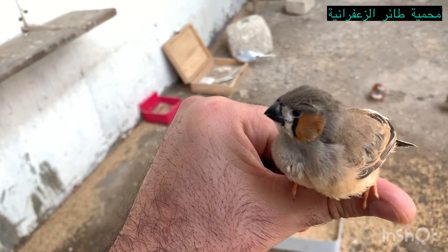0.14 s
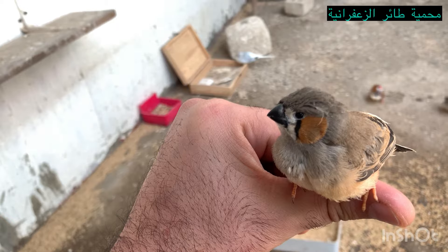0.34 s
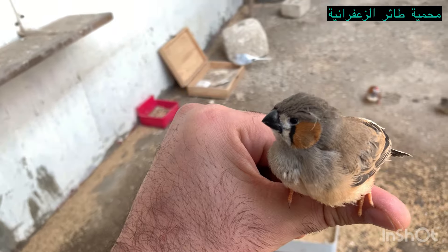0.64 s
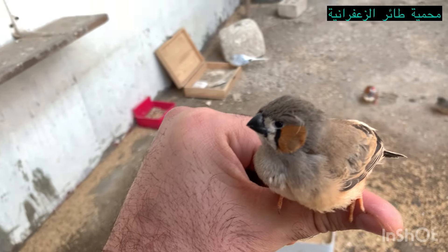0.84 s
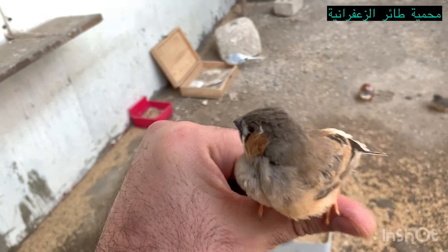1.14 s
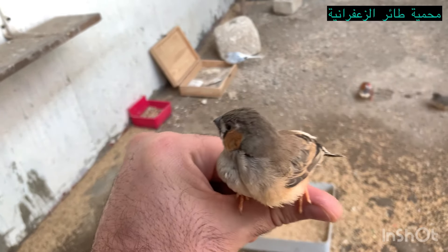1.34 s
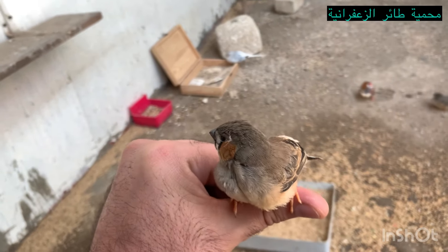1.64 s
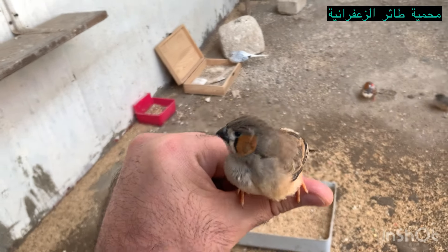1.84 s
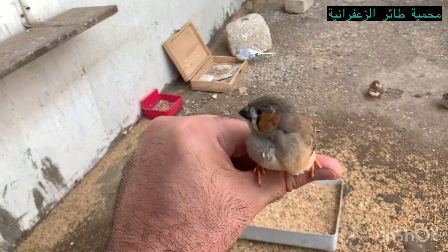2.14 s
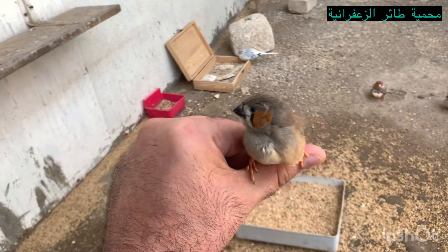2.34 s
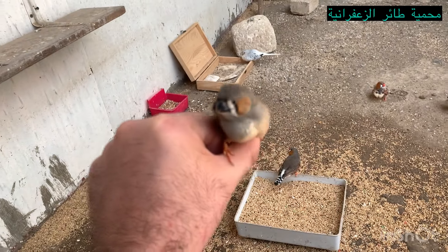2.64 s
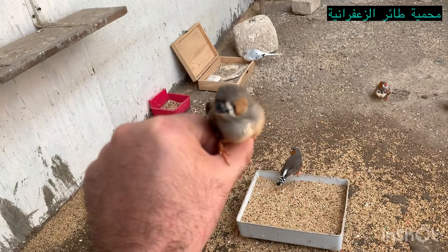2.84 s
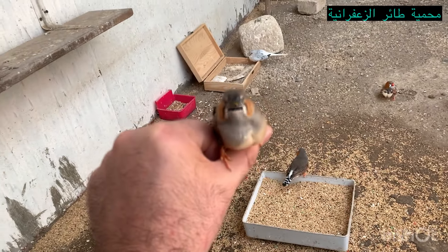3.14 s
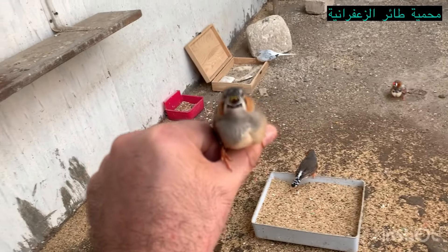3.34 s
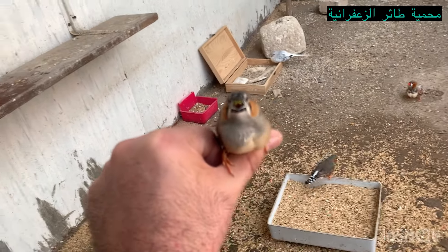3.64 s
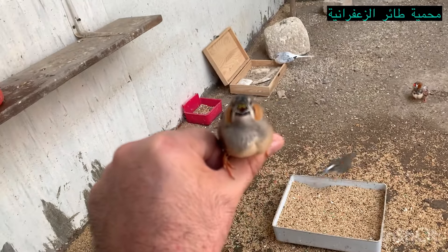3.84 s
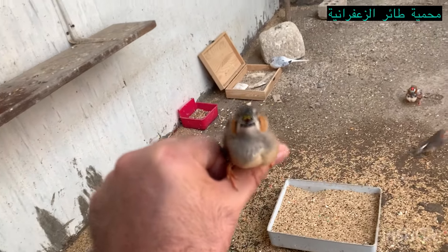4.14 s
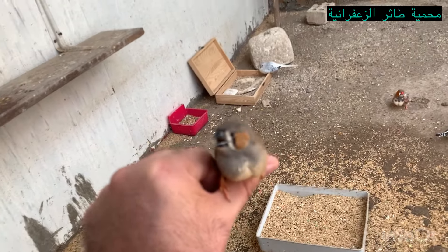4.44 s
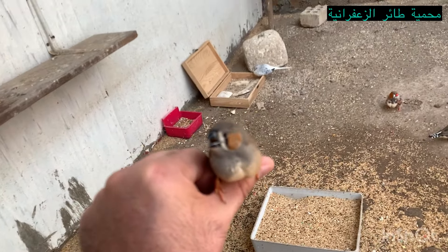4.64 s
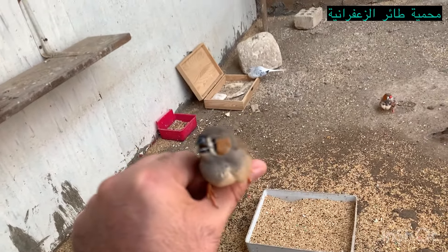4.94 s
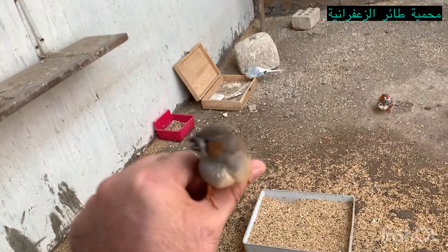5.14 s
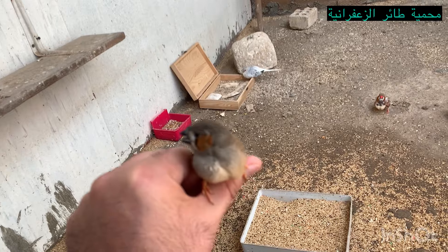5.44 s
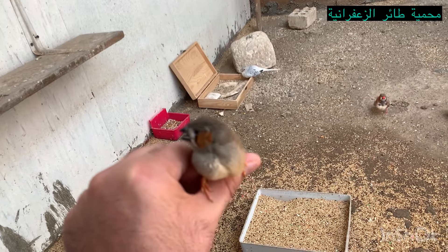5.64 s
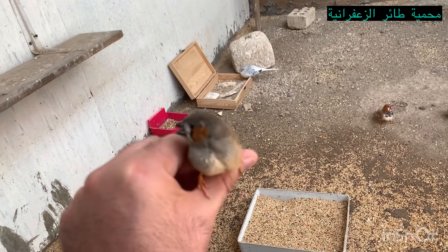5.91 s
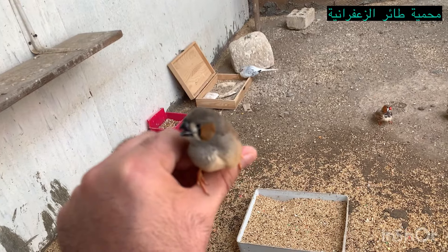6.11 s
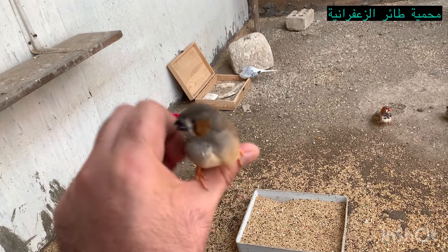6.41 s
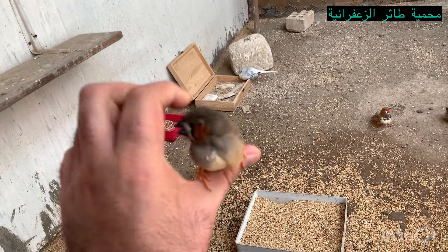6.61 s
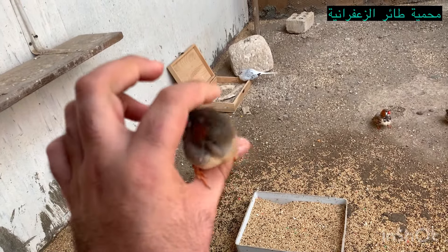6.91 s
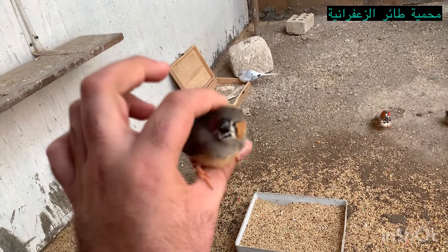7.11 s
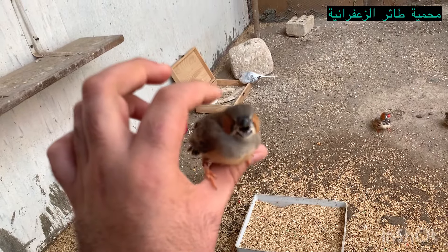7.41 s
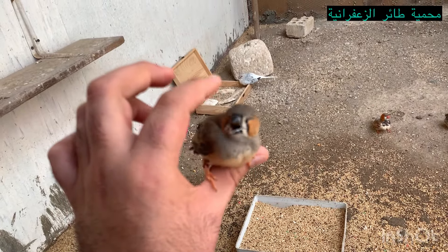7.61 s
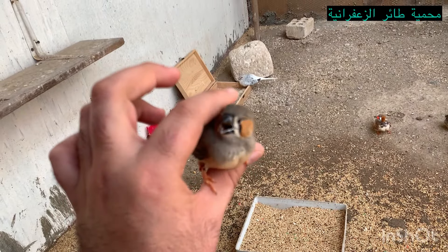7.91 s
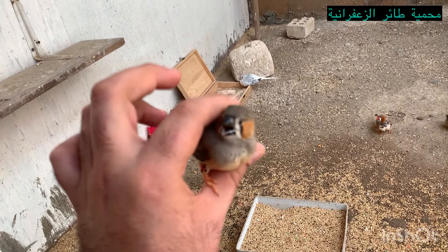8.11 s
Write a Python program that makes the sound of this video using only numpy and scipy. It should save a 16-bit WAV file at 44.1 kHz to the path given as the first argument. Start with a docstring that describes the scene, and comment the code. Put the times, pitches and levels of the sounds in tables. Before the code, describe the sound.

Handheld stereo pickup among finches in a concrete-walled yard. A singer cycles a brisk nasal phrase built around a loud falling chirp, pausing briefly around the middle and near the end. Single high peeps cut through, most clearly at the start, and scratchy begging calls cluster in the middle and last second. Faint flock chirps, soft air, fading tyre noise and low hum lie behind; a low gust or bump comes late.

```python
"""Zebra finches in a small walled aviary

One bird repeats a motif: a pip, a soft slur, a whistle, a steep loud slur and a closing call. Others rasp,
peep and chirp around it. Clear notes are gliding sines or stacks of harmonics; hoarse ones are uneven
pulses and puffs of air filtered by a throat and beak. Random echo taps act as hard walls. Shaped noise makes
the air, tyres and a low rumble with a late burst of handling or wind. Wavering sines hum, damped ones bump."""
import sys
import numpy as np
from scipy import signal
from scipy.fft import rfft, irfft, next_fast_len
from scipy.io import wavfile
from scipy.ndimage import uniform_filter1d

SR = 44100
rng = np.random.default_rng(int(sys.argv[2]) if len(sys.argv) > 2 else 0)


def to_wav(s):
    """Save 16-bit WAV."""
    ch = np.atleast_2d(s).T  # columns
    pcm = np.round(np.clip(ch, -1, 1) * 32767)  # PCM
    wavfile.write(sys.argv[1], SR, pcm.astype(np.int16))


N = 364221
TIME, FREQ = np.arange(N) / SR, np.fft.rfftfreq(N, 1 / SR)
EDGE_HZ = 15750  # top of the sound's frequency range


def gain_of(db):
    """Decibels to amplitude."""
    return 10 ** (np.asarray(db) / 20)


def evened(x):
    """Scales to rms 1."""
    return x / np.sqrt(np.mean(x ** 2) + 1e-20)


def read(points, hz):
    """Reads a table on a log-frequency axis."""
    f, value = np.transpose(points)
    return np.interp(np.log(hz + 1), np.log(f + 1), value)


def level(rows, axis=1):
    """One dB column of a time curve as a gain for every sample."""
    rows = np.array(rows)
    return gain_of(np.interp(TIME, rows[:, 0], rows[:, axis]))


def add(mix, s, sound):
    """Mixes a sound in at time s."""
    start = round(s * SR)
    sound = sound[max(-start, 0):]
    part = mix[max(start, 0):][:len(sound)]
    part += sound[:len(part)]


def wander(t, hz):
    """Smooth random motion of rms about 1: sixteen sines at rates up to hz."""
    rates, phases = rng.random((2, 16, 1))
    return np.sin(2 * np.pi * (hz * rates * t + phases)).sum(0) / np.sqrt(8)


def phase_of(hz):
    """Adds up a changing pitch into the phase of a tone, in radians."""
    return 2 * np.pi * np.cumsum(hz) / SR


def arch(t, rise, fall):
    """A note's envelope; rise and fall are shares of its length."""
    u = t / t[-1]
    return np.sin(np.pi / 2 * np.clip(np.minimum(u / rise, (1 - u) / fall), 0, 1)) ** 2


def patchy(x, depth_db, size=18):
    """Level varies at random in patches some 300 Hz wide and some tens of ms long; scales to rms 1."""
    z = signal.stft(x, nperseg=512, noverlap=384)[2]
    patches = uniform_filter1d(rng.standard_normal(z.shape[1:]), size=4, axis=0)
    patches = uniform_filter1d(patches, size=size, axis=1)
    changed = z * gain_of(depth_db * evened(patches))
    return evened(signal.istft(changed, nperseg=512, noverlap=384)[1][:, :N])


# How alike noise and echoes are in the left and right channels. Each row: frequency in Hz, likeness 0-1.
LIKENESS = [(100, 0.99), (300, 0.53), (800, 0.99), (2000, 0.81), (5000, 0.33), (12000, 0.26)]


def paired(z):
    """Two unrelated spectra become partly alike."""
    same = np.clip(read(LIKENESS, np.linspace(0, SR / 2, z.shape[1])), 0, 1)
    return np.array([z[0], same * z[0] + np.sqrt(1 - same ** 2) * z[1]])


def noise(gain):
    """Stereo noise of a given spectrum, rms 1."""
    return evened(irfft(paired(rfft(rng.standard_normal((2, N)))) * gain, N))


# Colour of the air and the rest of the flock. Each row: frequency in Hz, relative level in dB per Hz.
AIR = [(300, -10.5), (700, -9), (1200, -6.5), (1900, -0.5), (3000, -3.5), (4000, -6.5), (5000, -13.5),
       (6500, -13), (8000, -39.5), (10000, -50.5), (13000, -36), (14500, -66.5)]


def air_wash(wash_db=-51):
    """A soft noise bed of air and far birds, varied at random in level."""
    wash = patchy(noise(gain_of(read(AIR, FREQ))), depth_db=4.5)
    return wash * gain_of(wash_db + 1.0 * wander(TIME, 14))


# Colour of the low rumble. Each row: frequency in Hz, relative level in dB per Hz.
RUMBLE = [(20, -19.5), (40, -5.5), (55, -3.5), (85, 4), (115, -5), (290, -10), (400, -24.5), (700, -23.5),
          (4000, -85)]
# How the low rumble swells and fades. Each row: time in seconds, base levels in dB of its deep and upper part.
RUMBLE_LEVELS = [(0.1, -52, -54.5), (0.89, -54.5, -53), (2.22, -56, -61), (6.98, -56.5, -59),
                 (7.45, -51.5, -49.5), (7.77, -59, -53.5), (7.86, -40.5, -48.5), (7.97, -42, -46),
                 (8.2, -45, -53)]


def low_rumble(split_hz=130, deep_trim_db=1):
    """Low rumble as noise in a deep and a flickering upper part, with a late burst of handling or wind."""
    rumble = gain_of(read(RUMBLE, FREQ))
    low = 1 / (1 + (FREQ / split_hz) ** 8)
    deep = noise(rumble * np.sqrt(low)) * level(RUMBLE_LEVELS) * gain_of(deep_trim_db)
    upper = noise(rumble * np.sqrt(1 - low)) * level(RUMBLE_LEVELS, axis=2)
    return deep + upper * gain_of(3.3 * wander(TIME, 15))


# How the tyre roar fades. Each row: time in seconds, level in dB.
TYRES_DB = [(0, -59), (1.3, -56), (2.1, -76.5)]
# Colour of the tyre roar. Each row: frequency in Hz, relative level in dB per Hz.
TYRES = [(150, -22), (350, 0), (600, 2.5), (3500, -78)]


def tyre_roar():
    """The tyres of a vehicle that drives away, as noise that fades."""
    return noise(gain_of(read(TYRES, FREQ))) * level(TYRES_DB)


# How the engine hum swells and fades. Each row: time in seconds, base level in dB.
HUM = [(0.79, -63), (0.83, -47), (3.36, -51), (6.73, -60.5), (8.1, -56.5)]


def engine_hum(hum_hz=52.0, hum_trim_db=-1, drone_hz=82.6, drone_db=-58):
    """A low tone, with a drone above it; both waver in pitch and level."""
    hum = evened(np.sin(phase_of(hum_hz * (1 + 0.0349 * wander(TIME, 6.5)))))
    hum = hum * level(HUM) * gain_of(hum_trim_db + 3.64 * wander(TIME, 13))
    drone = evened(np.sin(phase_of(drone_hz * (1 + 0.0239 * wander(TIME, 6.4)))))
    return hum + drone * gain_of(drone_db + 2.3 * wander(TIME, 7.1))


# Light bumps close by. Each row: start in seconds, level in dB, pitch in Hz.
BUMPS = [(.008, -39, 550), (0.33, -46, 408), (6.869, -41, 300)]


def bumps(ring_s=0.09):
    """Dull knocks: sines that lose 60 dB in ring_s."""
    out, t = np.zeros(N), np.arange(SR // 8) / SR
    for s, db, hz in BUMPS:
        knock = gain_of(db - 60 * t / ring_s) * np.sin(2 * np.pi * hz * t)
        add(out, s, knock * (1 - np.exp(-t / 0.00047)))  # softened onset
    return out


# Extra phase between left and right for the loud slur. Each row: frequency in Hz, phase in radians.
PERCH_PHASE = [(600, 0.73), (2000, 0.7), (2900, 1), (3500, -2), (4200, 0), (4600, 0.5)]


def aviary(x, direct_db, wet_db, t60=0.21, first_echo=0.004, scatter=1.0, perch=False):
    """Direct sound with a wandering left-right phase, plus dense wall echoes whose pattern slowly shifts."""
    t, echoes = np.arange(SR // 3) / SR, 0
    for k in range(3):  # three echo patterns take turns
        taps = rng.standard_normal((2, len(t))) * (rng.random((2, len(t))) < 3000 / SR)
        tail = irfft(paired(rfft(taps * gain_of(-60 * t / t60) * (t > first_echo))))
        tail = tail / np.linalg.norm(tail, axis=1, keepdims=True)
        share = np.sqrt(2 / 3) * np.cos(np.pi * (TIME * .45 + k / 3))
        echoes = echoes + signal.oaconvolve((x * share)[None], tail, axes=1)[:, :N]
    coarse, sides = TIME[::256], np.array([[1], [-1]])
    angle = scatter * np.interp(TIME, coarse, wander(coarse, 6))
    size = next_fast_len(N)
    lag = read(PERCH_PHASE, np.fft.rfftfreq(size, 1 / SR)) if perch else 0
    # only positive frequencies are kept, so the phase can be turned freely
    arrival = np.fft.ifft(2 * rfft(x, size) * np.exp(.5j * lag * sides), size)[:, :N]
    direct = (arrival * np.exp(.5j * angle * sides)).real
    return gain_of(direct_db) * direct + gain_of(wet_db) * echoes


def whistles(rows, waver, flutter, rise, fall, second, overtones_db):
    """Trembling glides; the other side of the syrinx adds a rough, husky tone at a ratio of the pitch."""
    out = np.zeros(N)
    for s, length, db, husk_db, *pitches in rows:
        t, husk = np.arange(0, length, 1 / SR), gain_of(husk_db)
        hz = np.interp(t, np.linspace(0, length, len(pitches)), pitches)
        hz = hz * (1 + .025 * husk * wander(t, 90))
        turn = phase_of(hz * (1 + waver * husk * wander(t, 611.0)))
        overtones = np.sin(2 * turn) + gain_of(-15) * np.sin(3 * turn)
        rough = np.sin(phase_of(second * hz * (1 + 0.03 * wander(t, 401.6))))
        tone = np.sin(turn) + gain_of(overtones_db) * overtones + husk * rough
        voice = evened(tone * np.exp(flutter * np.sqrt(husk) * wander(t, 168)))
        add(out, s, gain_of(db) * voice * arch(t, rise, fall))
    return out


def flock(count=170, flock_db=-55.0, spread_db=1.5, lowest_hz=1900, husk_db=-10):
    """Many faint short chirps from the far end of the aviary, at random times and pitches."""
    when, length, size, pitch, glide = rng.random((count, 5)).T
    hz, bend = lowest_hz * 2.1 ** pitch, 1 + 0.2886 * (glide - .5)
    db = flock_db + spread_db * np.log(size + 0.0076)
    rows = [when * N / SR, 0.0219 + 0.0462 * length, db, np.full(count, husk_db), hz / bend, hz * bend]
    return whistles(np.transpose(rows), waver=0.065, flutter=0.14, rise=0.22, fall=0.21,
                    second=1.6, overtones_db=-19.5)


# Low calls that sag or dip in pitch. Each row: start in seconds, length in seconds, level in dB,
# then pitch at start, middle and end in Hz.
FAR_CALLS = [(4.402, 0.08, -55, 1900, 1750, 1740), (4.579, .07, -55, 1946, 1790, 2110)]


def far_calls(husk_db=-15):
    """Low calls of a far bird that sag or dip in pitch, with strong overtones."""
    rows = [(s, length, db, husk_db, *hz) for s, length, db, *hz in FAR_CALLS]
    return whistles(rows, waver=.06, flutter=0.55, rise=0.17, fall=0.35, second=1.5, overtones_db=-10)


# Clear chirps. Each row: start in seconds, length in seconds, level in dB, huskiness in dB,
# then pitch at start and end in Hz.
CHIRPS = [(.11, 0.11, -55.5, -13, 3040, 3220), (.255, 0.062, -50.5, -11.5, 3135, 3190),
          (.455, 0.0326, -51, -20, 3110, 3150), (.72, 0.049, -43.5, -18.5, 3400, 3795),
          (.765, .049, -50, -12, 1874, 2340), (.815, .04, -46.5, -13, 2530, 2694),
          (.85, 0.019, -48, -8.5, 4780, 4330), (.992, 0.03, -46, -8, 3780, 3680),
          (1.018, 0.03, -49, -6, 2890, 2750), (1.04, 0.0375, -49, -2.5, 2153, 1920),
          (1.58, 0.013, -49, -9, 4010, 3780), (1.632, 0.033, -43.5, -20, 2800, 3136),
          (2.08, 0.044, -44.5, -2.5, 2574, 3093), (2.745, 0.013, -50, -10, 3820, 4330),
          (3.155, 0.041, -45.5, -9, 2870, 3230), (3.51, .06, -49, -24, 3130, 3200),
          (3.745, 0.034, -41, -16, 3813, 3720), (4.42, 0.041, -54, -20, 3070, 2964),
          (4.635, 0.051, -48, -10.5, 2750, 3360), (5.095, 0.027, -44, -22, 4200, 4140),
          (6.585, 0.085, -45.5, -6, 3890, 3550), (6.89, .055, -48, -4, 3744, 3245),
          (7.055, 0.049, -42.5, -8.5, 4190, 4380), (7.78, 0.051, -43, -5, 4500, 3960),
          (7.82, .08, -43.5, -3, 3555, 3230)]


def far_chirps():
    """Short gliding whistles from farther off."""
    return whistles(CHIRPS, waver=0.062, flutter=0.79, rise=0.13, fall=0.15, second=.81, overtones_db=-33)


# The throat of the hoarse calls. Each row: frequency in Hz, gain in dB.
RASP_THROAT = [(500, -33), (1100, -25), (1700, 0.5), (2300, -12), (3400, 5.5), (4500, -3), (5800, -2),
               (6700, -8), (7800, -17), (10000, -45), (11500, -33), (13400, -41.5), (14800, -47)]
# A wider beak rings higher and lets out more treble: dB per octave for each octave above rest.
BEAK_REST_HZ, OPENING_TILT_DB = 5000, 11.5


def rasps(rows, pitch_hz, rough, tilt_db, jitter=0.0348, beak_db=6, beak_width_hz=600, swell_s=.009,
          rise=0.24, fall=0.45, sag=.25):
    """Unsteady, sagging pulses and puffs of air from the syrinx sputter through throat and open beak."""
    out, size = np.zeros(N), 8192
    f = np.fft.rfftfreq(size, 1 / SR)
    k = np.arange(1, 25)[:, None]  # harmonic numbers
    for s, length, db, beak_hz in rows:
        t = np.arange(0, length + 2 * swell_s, 1 / SR)[:size]
        u = t / t[-1]
        bend = .12 * rng.standard_normal() + .12 * np.sin(np.pi * u) - sag * (u - .5)
        hz = pitch_hz * np.exp(bend + jitter * wander(t, 405.8))
        turns = np.cumsum(hz) / SR
        pulses = ((k * hz < EDGE_HZ) * np.cos(2 * np.pi * k * turns)).sum(0)
        puffs = rng.standard_normal(size)[:len(t)] * (0.17 + np.exp(-(turns % 1) / 0.3))
        drive = (1 - rough) * evened(pulses) + rough * evened(puffs)
        # each pulse has its own strength
        cycle_size = np.exp(.55 * rng.standard_normal(400))[turns.astype(int) % 400]
        drive = drive * cycle_size * np.exp(.35 * wander(t, 260) + .4 * wander(t, 80))
        slope_db = tilt_db + OPENING_TILT_DB * np.log2(beak_hz / BEAK_REST_HZ)
        colour_db = read(RASP_THROAT, f) + slope_db * np.log2(np.clip(f, 1000, 6500) / 4000)
        colour_db = colour_db + beak_db / (1 + ((f - beak_hz) / beak_width_hz) ** 2)
        voice = evened(irfft(rfft(drive, size) * gain_of(colour_db))[:len(t)])
        add(out, s - swell_s, gain_of(db) * voice * arch(t, rise, fall))
    return np.std(out) * patchy(out[None], depth_db=4.5, size=9)[0]


# Hoarse begging calls. Each row: start in seconds, length in seconds without the extra swell at both ends,
# level in dB, beak resonance in Hz.
RASPS = [(.279, 0.057, -52.5, 6450), (.449, 0.062, -43, 4750), (1.518, 0.022, -49, 4870),
         (1.692, .012, -49, 6070), (2.275, 0.036, -49, 5350), (2.315, 0.069, -41.5, 4620),
         (2.481, 0.054, -34.5, 4680), (2.62, 0.061, -48, 7030), (2.975, 0.071, -42.5, 5650),
         (3.516, 0.065, -37, 3800), (3.58, 0.037, -41, 5000), (3.69, .08, -33.5, 4970),
         (3.9, .04, -39, 5400), (3.945, 0.039, -39.5, 6340), (4.018, 0.051, -40.5, 6600),
         (4.536, 0.06, -42.5, 3680), (4.856, 0.045, -35.5, 4940), (4.974, 0.054, -38, 5400),
         (5.094, 0.066, -38.5, 4280), (5.125, 0.095, -40.5, 6900), (5.259, 0.064, -40, 3470),
         (5.379, 0.082, -41, 3550), (6.375, 0.046, -45.5, 5520), (6.448, 0.049, -43.5, 5320),
         (6.557, 0.029, -46, 5900), (6.995, 0.076, -43, 5530), (7.59, .1, -39.5, 5080),
         (8.007, 0.032, -33, 5300), (8.095, 0.094, -36.5, 5100), (8.237, 0.038, -38, 5500)]


def begging_calls():
    """Hoarse calls of the other birds."""
    return rasps(RASPS, pitch_hz=633.6, rough=0.35, tilt_db=3.0)


# Thin high peeps. Each row: start in seconds, length in seconds, level in dB, huskiness in dB,
# steady pitch at start and end in Hz, place of the loudest moment 0-1.
PEEPS = [(0, 0.068, -26.5, -13.5, 5290, 5265, 0.41), (0.599, .088, -24, -12, 5313, 5202, 0.58),
         (1.246, 0.094, -28, -8.5, 5280, 5350, .6), (2.806, 0.079, -29, -11.5, 5470, 5340, 0.34),
         (5.662, .082, -29, -6, 5530, 5020, .45), (6.23, 0.096, -28.5, -9.5, 5325, 5190, 0.61),
         (6.735, .104, -29, -8.5, 5366, 5180, 0.55)]


def peeps(scoop_hz=220, scoop_s=.007, swell_db=10, second=1.053, rough=0.037, waver=0.0082, flutter=0.24,
          rise=0.17, fall=0.17, overtones_db=-31):
    """One syrinx side scoops up to a steady, fluttering tone; the other adds a rough tone just above."""
    out = np.zeros(N)
    for s, length, db, husk_db, start_hz, end_hz, crest in PEEPS:
        t = np.arange(0, length, 1 / SR)
        u = t / t[-1]
        hz = start_hz + (end_hz - start_hz) * u - scoop_hz * np.exp(-t / scoop_s)
        turn = phase_of(hz * (1 + waver * wander(t, 200)))
        overtones = gain_of(overtones_db) * (np.sin(2 * turn) + gain_of(-13) * np.sin(3 * turn))
        husky = gain_of(husk_db) * np.sin(phase_of(second * hz * (1 + rough * wander(t, 500))))
        swell = gain_of(-swell_db * (2 * (u - crest)) ** 2)
        voice = (np.sin(turn) * swell + overtones + husky) * np.exp(flutter * wander(t, 150))
        add(out, s, gain_of(db) * np.sqrt(2) * voice * arch(t, rise, fall))
    return out


# The singer's motifs. Each row: time of the loud slur in seconds, base level in dB,
# base level of the lead-in whistle and tick in dB.
MOTIFS = [(1.3657, -22.5, -33), (1.962, -22, -32.5), (2.572, -22.5, -38), (3.1818, -21.5, -29.5),
          (3.791, -22, -31), (4.9681, -23, -30.5), (5.5664, -22.5, -30.5), (6.165, -22, -31.5),
          (6.7711, -22.5, -29), (7.378, -23.5, -30), (8.39, -23, -31)]


def sung(notes, axis=1):
    """Repeats notes in every motif, adding their levels to one of its dB columns."""
    return [(motif[0] + s, length, motif[axis] + db, *rest)
            for motif in MOTIFS for s, length, db, *rest in notes]


# The motif's hoarse parts. Each row: start in seconds from the loud slur, length in seconds without the
# extra swell at both ends, level in dB relative to the motif, beak resonance in Hz.
MOTIF_RASPS = [(-.272, 0.023, -21.5, 5860), (-.205, .04, -21, 5420), (.02, .055, -19.5, 5600),
               (.22, 0.036, -22, 5820)]


def hoarse_parts():
    """The singer's own rasps."""
    return rasps(sung(MOTIF_RASPS), pitch_hz=719, rough=.3, tilt_db=-5, swell_s=0.0027)


# A sagging whistle before the loud slur. Each row: start in seconds from the slur, length in seconds,
# level in dB relative to the motif's lead-in, huskiness in dB.
LEADS = [(-0.09, 0.091, -2, -15)]
# Its pitch in Hz at five evenly spaced moments from start to end.
LEAD_HZ = (4900, 4734, 4640, 4603, 4670)
# A thin flat tick before the whistle. Each row: the columns of LEADS, then pitch at start and end in Hz.
TICKS = [(-.235, 0.026, -13, -12, 4890, 4850)]


def lead_ins():
    """The husky tick and whistle that lead into the loud slur."""
    rows = [(*row, *LEAD_HZ) for row in sung(LEADS, axis=2)] + sung(TICKS, axis=2)
    return whistles(rows, waver=0.059, flutter=0.72, rise=0.34, fall=0.76, second=.81, overtones_db=-46.5)


def slurs(rows, throat, jitter, rise_s, fall_s, drift, flicker_db=4):
    """As the pitch glides, each harmonic moves through the throat's resonances and changes in level."""
    out, k = np.zeros(N), np.arange(1, 19)[:, None]  # k: harmonic numbers
    for s, length, db, fade_db, start_hz, end_hz, bend in rows:
        t = np.arange(0, length, 1 / SR)
        hz = start_hz * (end_hz / start_hz) ** ((t / length) ** bend)
        hz = hz * (1 + jitter * wander(t, 500) + drift * wander(t, 40))
        throat_db = read(throat, k * hz)
        # each harmonic wavers in level at random, most where the throat is weak
        flicker_each = np.array([wander(t, 111.0) for _ in k])
        flicker = gain_of(flicker_db * flicker_each * np.clip(-throat_db / 10, 0, 1))
        stack = gain_of(throat_db) * flicker * (k * hz < EDGE_HZ) * np.sin(k * phase_of(hz))
        envelope = gain_of(db + fade_db * t / length) * arch(t, rise_s / length, fall_s / length)
        add(out, s, stack.sum(0) * envelope)
    return out


# The singer's throat in the soft notes. Each row: frequency in Hz, gain in dB.
SOFT_THROAT = [(500, -16.5), (1100, -10.5), (1600, -9.5), (2200, -24.5), (2850, 8), (3300, -14.5),
               (3900, -1), (4700, -18), (6500, -40), (9000, -58)]
# A flat pip, a slur and a closing call. Each row: start in seconds from the loud slur, length in seconds,
# level in dB relative to the motif, level change over the note in dB, pitch at start and end in Hz,
# bend (above 1 the pitch moves late).
SOFT_NOTES = [(-.273, 0.085, -30.5, -9, 679, 686, 0.82), (-.205, .073, -21.5, 5.5, 958.5, 510, 1.05),
              (.222, .055, -28.5, 2, 1060, 850, 1.05)]


def soft_notes():
    """The low notes around the loud slur."""
    return slurs(sung(SOFT_NOTES), SOFT_THROAT, jitter=0.017, rise_s=0.0069, fall_s=0.011, drift=0.024)


# The singer's throat in the loud slur. Each row: frequency in Hz, gain in dB.
SLUR_THROAT = [(500, -25), (1000, -16), (1400, -23), (2000, -19), (2400, -25), (2800, -12.5), (3250, -8),
               (3600, -10), (3860, -3), (4100, -7), (4500, -21.5), (5300, -34.5), (6500, -29), (8000, -55),
               (13000, -68.5)]
# The slur falls through its registers. Each row: the same columns as the soft notes.
SLUR_STEPS = [(.001, 0.0152, 1.5, 2.5, 4014, 3564, 1.05), (.015, .019, 0, 7, 2178, 1605, 2.05),
              (.031, .017, -2, 0.5, 1460, 1220, 1.6), (.047, .055, -10, -12, 1126, 605, .9)]


def loud_slurs():
    """The steep dive at the heart of each motif."""
    return slurs(sung(SLUR_STEPS), SLUR_THROAT, jitter=0.0087, rise_s=0.0037, fall_s=0.0042, drift=0.0094)


def scene():
    """Each voice gets its own share of direct sound and room; the loud slur keeps to one perch."""
    background = air_wash() + low_rumble() + tyre_roar() + engine_hum() + bumps()
    far = aviary(flock() + far_calls() + far_chirps(), direct_db=3, wet_db=5.5)
    begging = aviary(begging_calls(), direct_db=-1.5, wet_db=5.5)
    peeping = aviary(peeps(), direct_db=-0.5, wet_db=-4.5, first_echo=0.0066, scatter=0.7)
    hoarse = aviary(hoarse_parts(), direct_db=-7.0, wet_db=1.5)
    soft = aviary(soft_notes() + lead_ins(), direct_db=1.0, wet_db=-4.5, scatter=0.24)
    loud = aviary(loud_slurs(), direct_db=-1.0, wet_db=-2, first_echo=0.0062, scatter=0.17, perch=True)
    return background + far + begging + peeping + hoarse + soft + loud


# Phase difference between left and right. Each row: frequency in Hz, phase in radians before the bass fade.
STEREO_PHASE = [(260, -1.4), (520, -2.5), (1640, -2.5), (2760, -2), (3360, -2), (3700, -5), (3960, -5),
                (4480, -4), (5600, -4), (6370, -5.5), (7150, -4.5)]


def record(dry):
    """A phase difference that varies with frequency widens the stereo image, less so in the bass."""
    above_bass = 1 - np.exp(-(FREQ / 280) ** 2)
    turn = np.exp(.5j * above_bass * read(STEREO_PHASE, FREQ) * np.array([[1], [-1]]))
    widened = irfft(rfft(dry) * turn, N)
    low_pass = signal.firwin(511, EDGE_HZ, window=("kaiser", 9), fs=SR)
    return signal.oaconvolve(widened, low_pass[None], "same")


dry = scene()
out = record(dry)
to_wav(out)
```